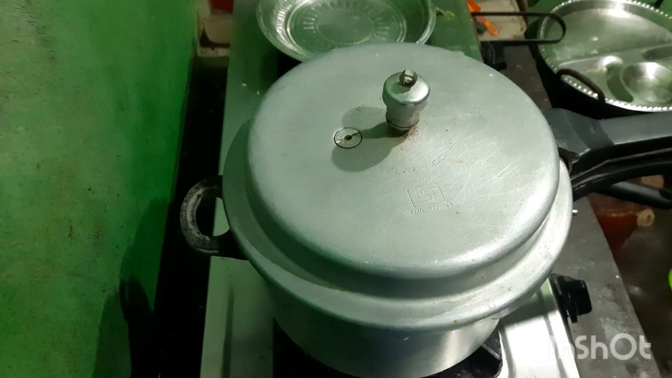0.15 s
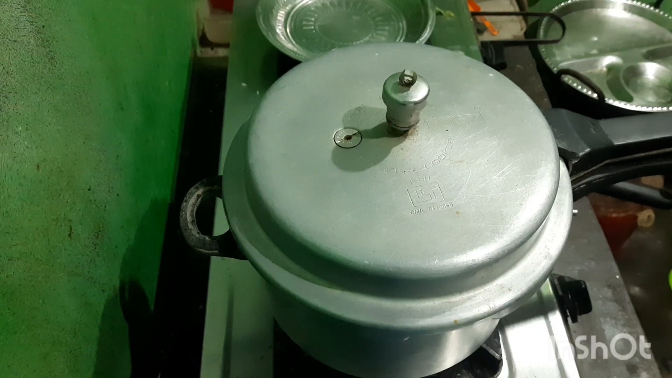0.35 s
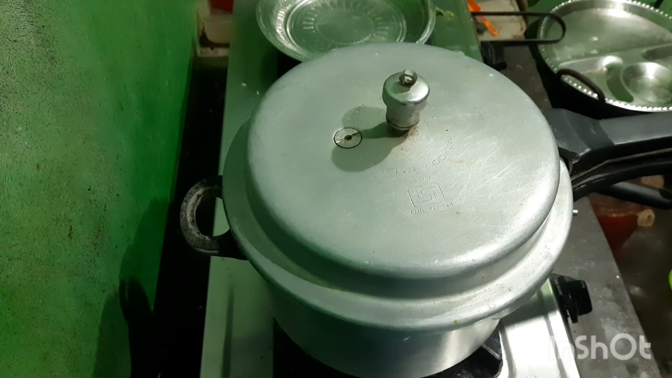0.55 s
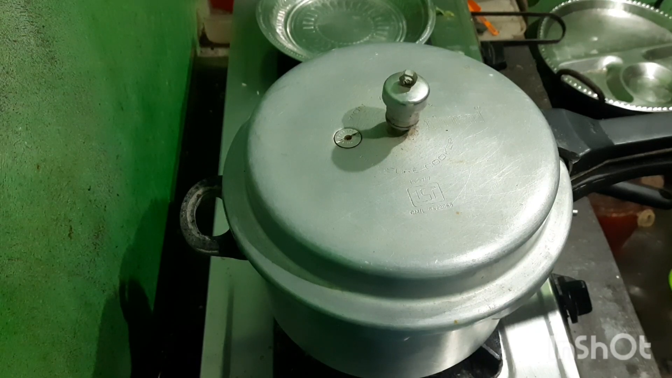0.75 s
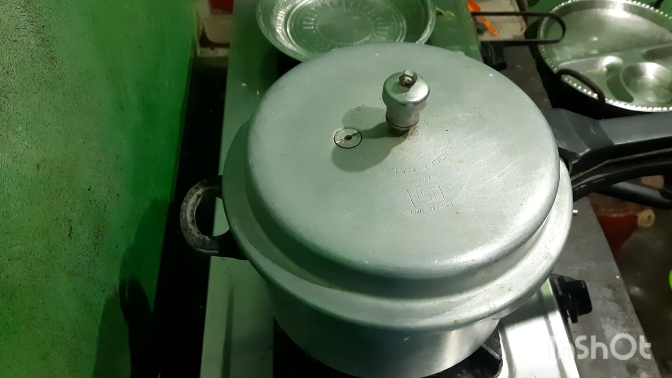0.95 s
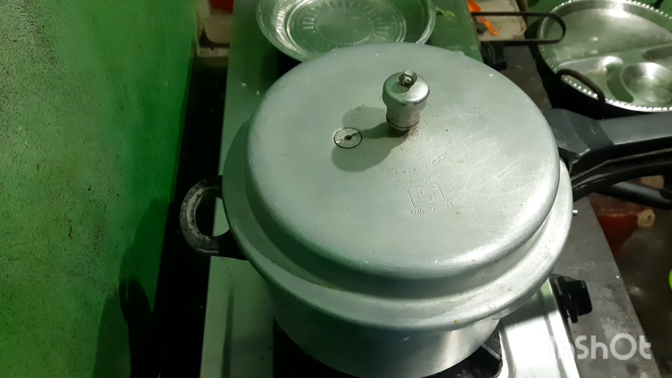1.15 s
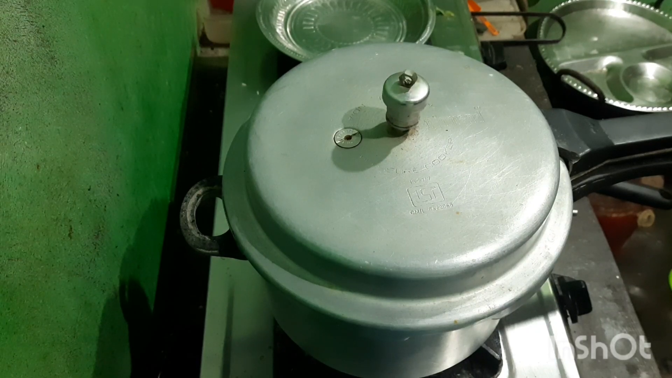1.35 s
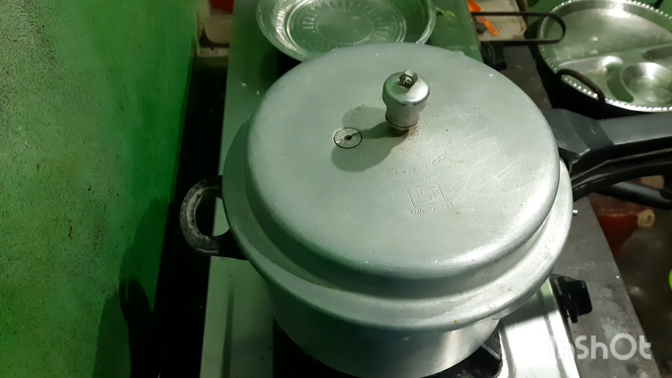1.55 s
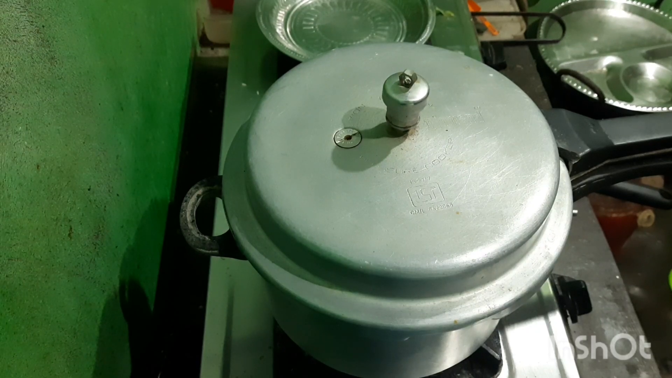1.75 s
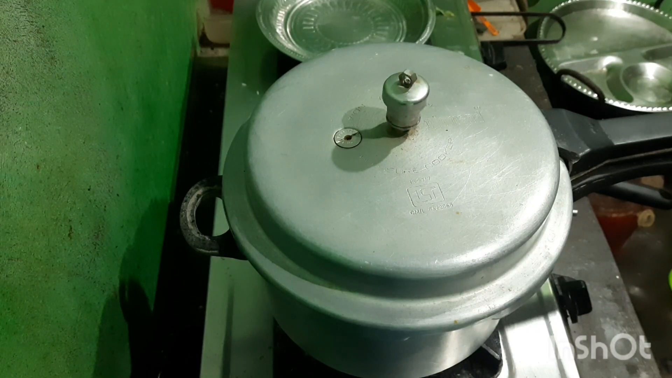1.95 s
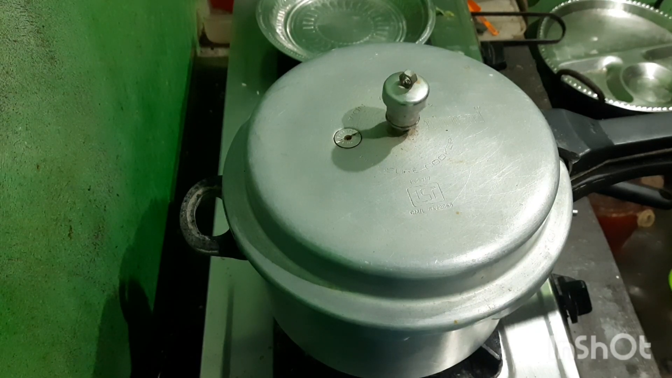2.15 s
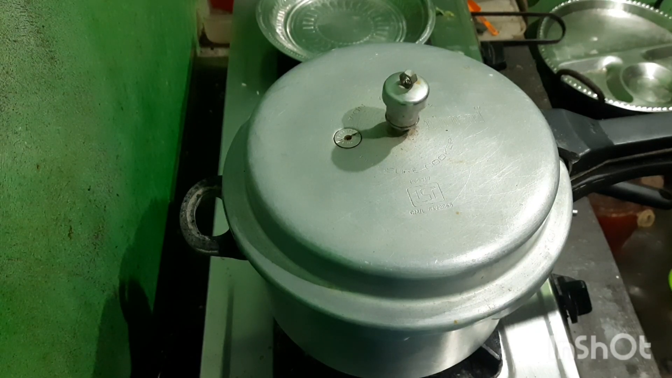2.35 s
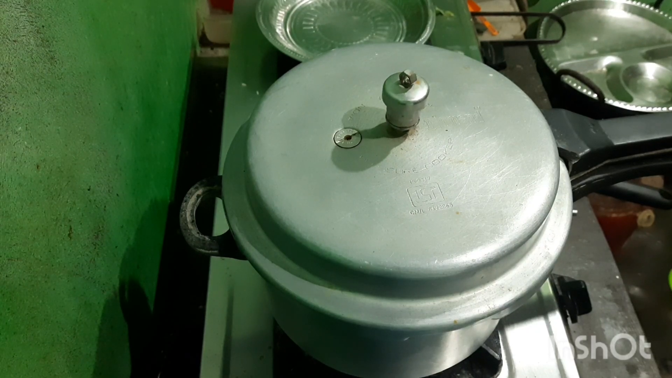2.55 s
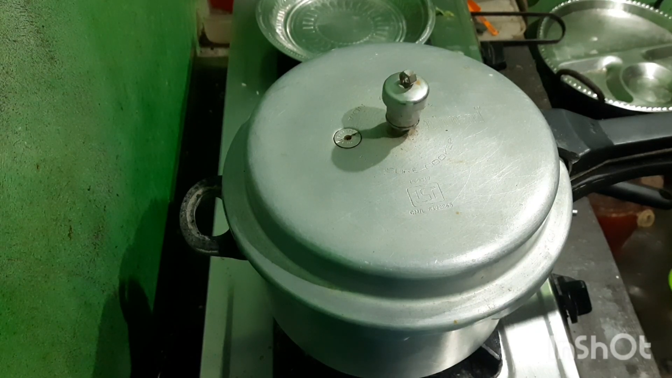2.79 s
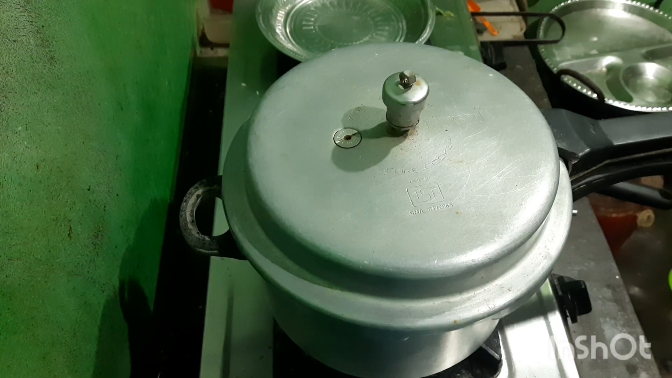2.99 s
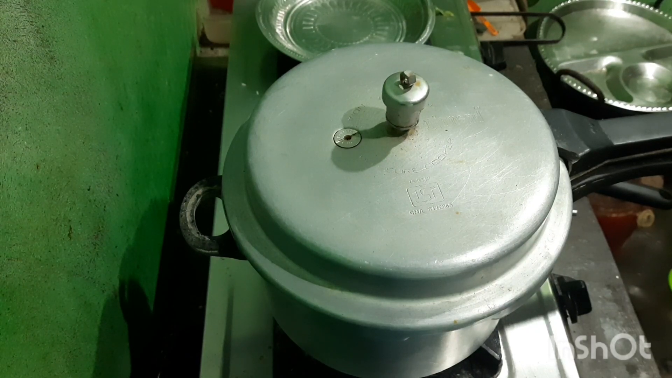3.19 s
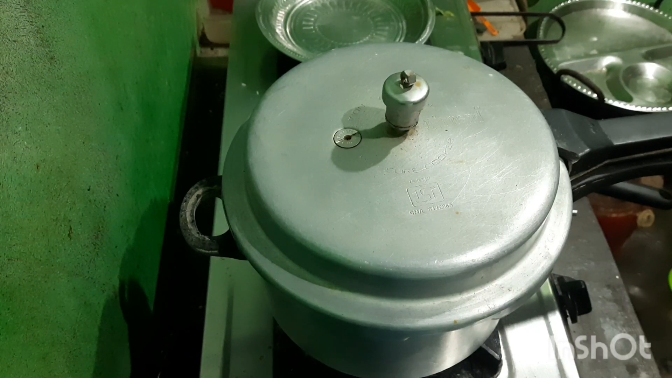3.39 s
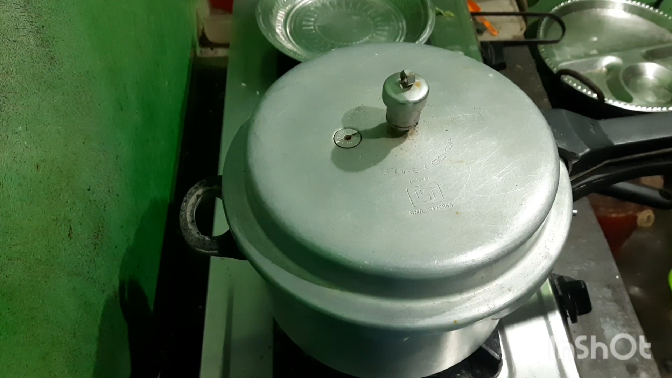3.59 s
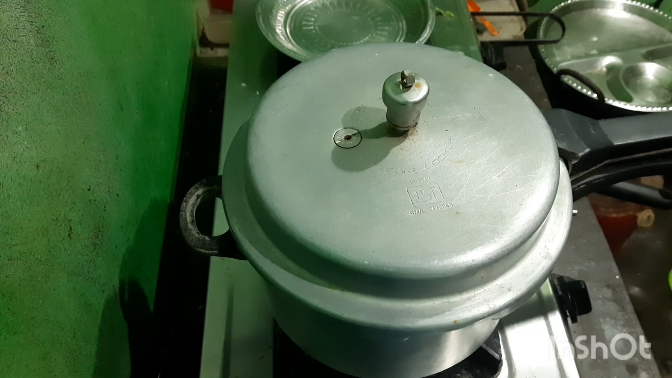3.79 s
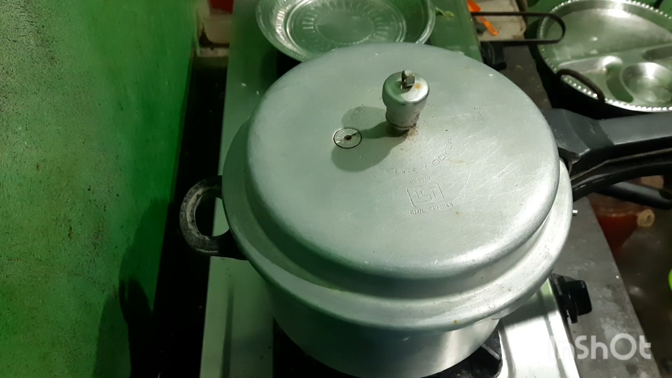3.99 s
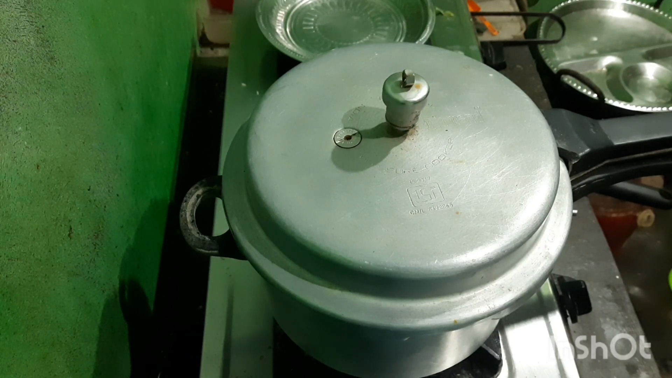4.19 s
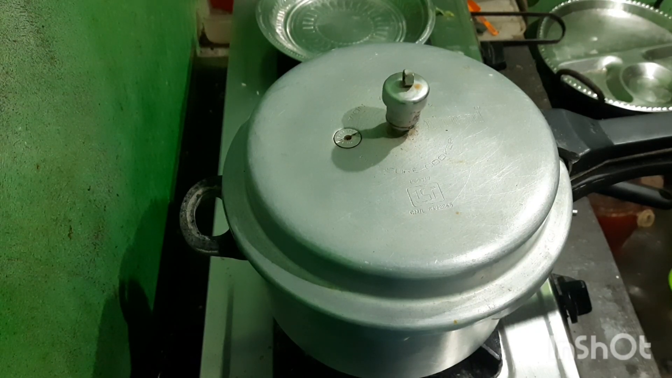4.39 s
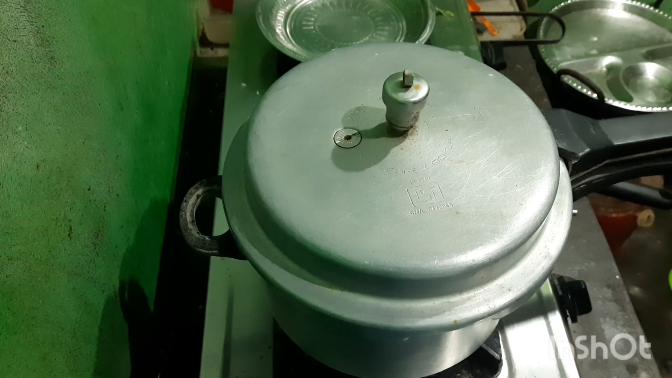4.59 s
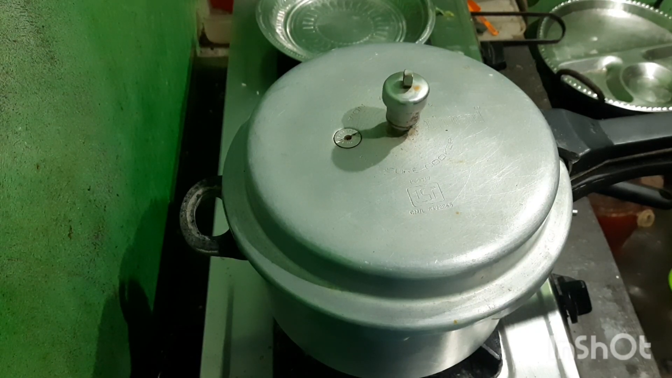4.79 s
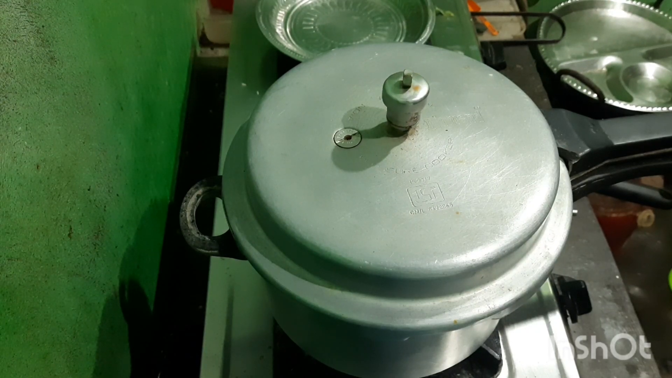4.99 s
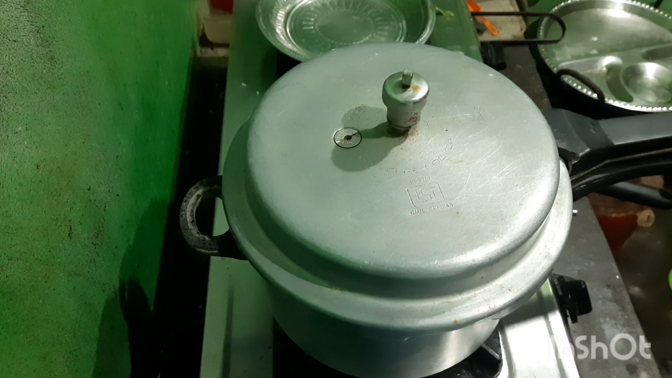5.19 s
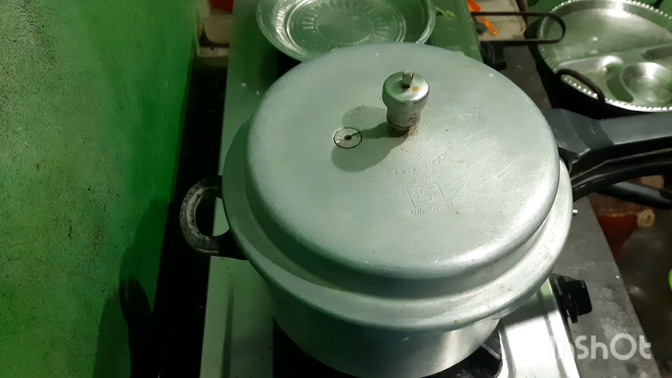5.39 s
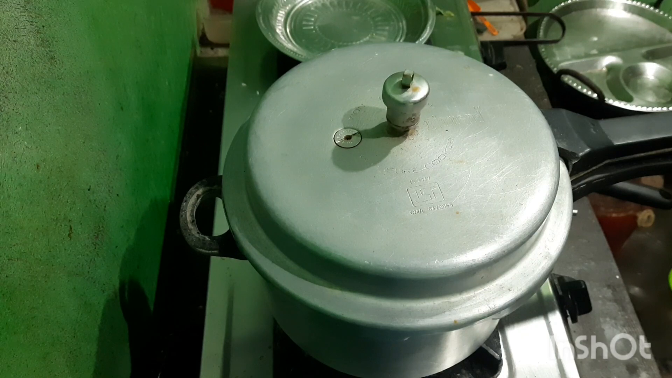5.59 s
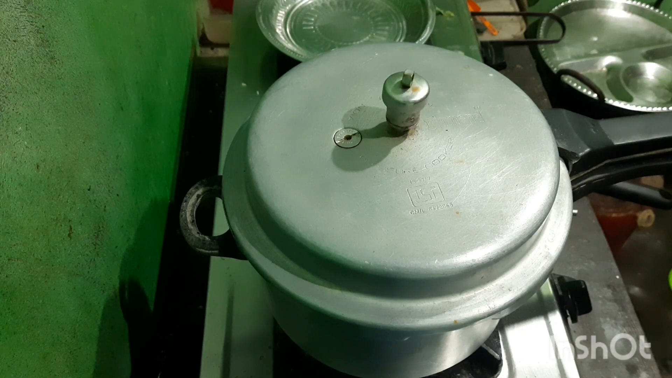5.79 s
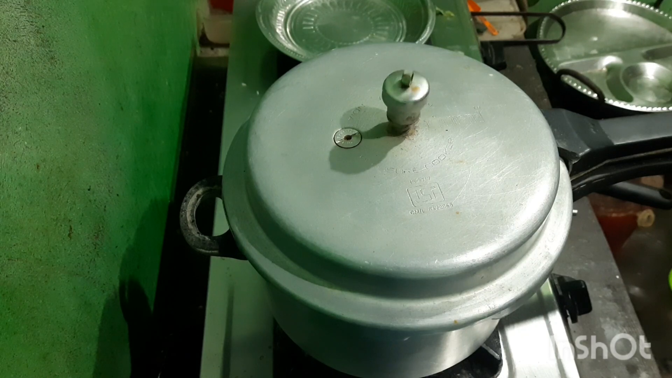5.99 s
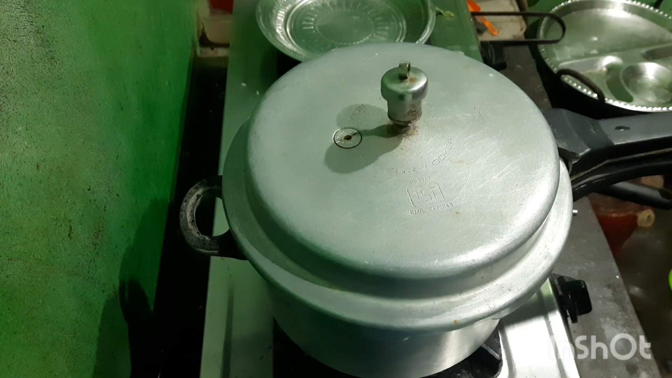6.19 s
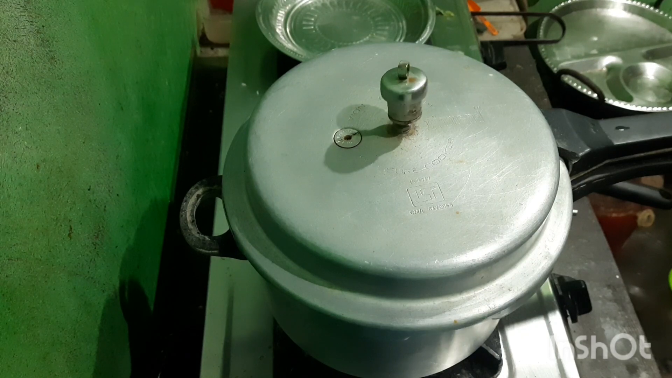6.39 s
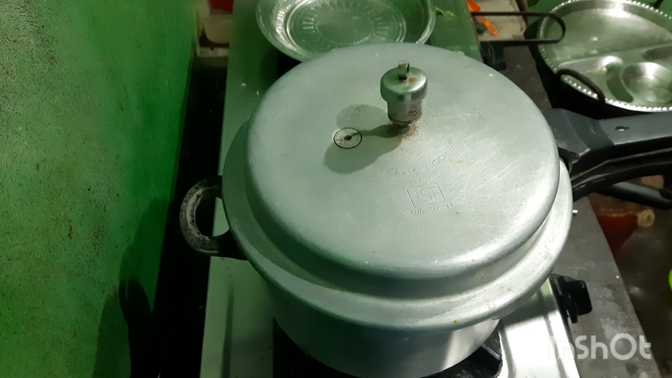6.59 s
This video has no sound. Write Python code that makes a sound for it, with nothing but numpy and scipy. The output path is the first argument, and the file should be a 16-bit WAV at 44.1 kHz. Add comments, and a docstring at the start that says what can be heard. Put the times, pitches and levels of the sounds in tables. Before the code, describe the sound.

Steam pulses from under a pressure cooker's rocking weight, building to a loud hissing blast over a low burner rumble.

```python
"""A pressure cooker hisses on a gas stove, close to a two-port microphone in a small hard kitchen.
Steam leaks under the weight, which rocks and lets it out in puffs, then lifts and vents.
The blast strikes the microphone as wind, left port first, then right.
Underneath: burner and house rumble in the room's low modes, and a fuzzy low drone."""
import sys
import numpy as np
from scipy import signal
from scipy.fft import rfft, irfft, next_fast_len
from scipy.io import wavfile
from scipy.ndimage import uniform_filter1d

SR = 44100
rng = np.random.default_rng(int(sys.argv[2]) if len(sys.argv) > 2 else 0)


def bounce(signal):
    """Save signal as a 16-bit WAV file at the path given by the first command-line argument."""
    frames = np.transpose(np.atleast_2d(signal))
    limited = np.clip(frames, -1, 1)
    pcm = np.round(limited * 32767).astype(np.int16)
    wavfile.write(sys.argv[1], SR, pcm)


N = 293265

# low drone: time_s, pitch_hz, level_db
DRONE = [(0, 189.8, -49), (1.2, 196.6, -51), (1.4, 180.4, -52.5), (3, 183.8, -49.5), (3.5, 181.4, -47),
         (5.3, 188.5, -48.5), (5.45, 185, -57), (6.65, 186, -63)]

# kitchen rumble: time_s, level_db, deep_gain_db
RUMBLE = [(0, -44, -4), (.08, -40.5, 2.5), (.6, -42.5, 0.5), (1.1, -42, 2.5), (1.7, -42.5, 0),
          (2.2, -44, 4), (2.7, -42.5, 0.5), (3.3, -43.5, -2.5), (4.3, -43.5, 2), (5, -46, -2),
          (5.5, -46, -1), (6, -44.5, -2.5)]
# rumble spectrum: freq_hz, gain_db
RUMBLE_SPECTRUM = [(30, -32), (55, -24), (75, -15), (140, -21), (270, -18), (420, -19), (550, -19),
                   (620, -27), (1000, -32), (2000, -50)]
# low room modes: centre_hz, width_hz, gain_db
ROOM_MODES = [(84, 16, 13), (107, 12, 16), (205, 22, 9), (247, 9, 10), (301, 11, 9), (344, 11, 11),
              (400, 20, 5)]
# rumble likeness between ports: freq_hz, coherence
RUMBLE_COHERENCE = [(60, 1), (200, 0.99), (400, 0.87), (700, 0.66)]

# wind per port, before the high-pass: time_s, level_db, fine_eddy_gain_db
WIND_LEFT = [(5.975, -47, -8.0), (5.985, -32, -15), (6.04, -27.5, 0), (6.094, -29, -1), (6.149, -31, 1),
             (6.203, -23, -1.7), (6.258, -24.5, -2), (6.312, -31, 6), (6.367, -30, 6.5),
             (6.422, -26.5, -2.5), (6.476, -31.5, 3.5), (6.531, -28.5, 3.5), (6.585, -36, 2),
             (6.64, -34, 8)]
WIND_RIGHT = [(6.04, -37, -8.0), (6.05, -24, -17), (6.099, -21.5, -10), (6.148, -16, -5),
              (6.197, -13.5, -5.5), (6.247, -17, -1), (6.296, -23.5, -4), (6.345, -19.0, -27),
              (6.394, -25, -12), (6.443, -30, -8), (6.492, -35, -3), (6.542, -18.5, -14),
              (6.591, -18, -4.5), (6.64, -17.5, -8.5)]
# blast front and hardest slaps: start_s, port (0 = left), signed_peak, width_ms
SLAPS = [(5.982, 0, -0.3, .9), (6.043, 1, 0.37, 1), (6.116, 1, 0.79, 0.89), (6.315, 0, -.27, 0.35),
         (6.35, 1, 0.58, 0.95), (6.373, 1, 0.64, 0.34), (6.515, 1, 0.72, .9), (6.544, 0, -.24, 0.55)]

# steam flow under the puffs: time_s, flow_db, valve_opening (0-1)
LEAK = [(0, -39.5, 0.3), (.06, -40, 0.7), (.24, -41, 0.7), (.246, -28, 0.3), (.6, -27, 0.28),
        (1.2, -28.5, 0.2), (1.45, -28.5, 0.22), (1.9, -28, 0.26), (2.3, -27.5, .4), (2.75, -28, 0.4),
        (2.95, -26.5, 0.54), (3.1, -29.5, 0.6), (3.4, -26.5, 0.72), (4, -28, 0.55), (4.5, -28, .6),
        (4.8, -25, 0.43), (5.1, -31.5, 0.67), (5.45, -22, 0.9), (5.53, -30, 0.85), (5.7, -21, 0.88),
        (5.79, -25.5, 0.64), (5.87, -19, 0.87), (5.95, -18, 0.5), (6.01, -19, 0.33), (6.13, -17, 0.42),
        (6.38, -19, 0.46), (6.53, -18, 0.5), (6.65, -17.5, 0.3)]
# one puff per rock of the weight: centre_s, peak_flow_db, length_s
PUFFS = [(0.264, -34, 0.06), (0.385, -33, 0.13), (0.544, -29.5, 0.3), (0.677, -45, 0.051),
         (0.76, -27.5, 0.095), (0.906, -27.5, 0.29), (1.05, -27.5, 0.17), (1.164, -28.5, 0.12),
         (1.275, -24.5, 0.13), (1.355, -26, 0.13), (1.477, -23, 0.13), (1.558, -23, 0.093),
         (1.673, -24.5, 0.095), (1.774, -25, 0.083), (1.885, -25, 0.096), (1.99, -26, 0.096),
         (2.068, -27, 0.11), (2.166, -27.3, 0.094), (2.249, -27.5, 0.12), (2.387, -26.5, 0.11),
         (2.506, -24, 0.1), (2.61, -24.5, 0.11), (2.713, -24.5, 0.085), (2.819, -23, 0.098),
         (3.054, -27, 0.14), (3.179, -26, 0.11), (3.294, -26.5, 0.094), (3.386, -29, 0.04),
         (3.469, -28, 0.12), (3.571, -27, 0.1), (3.68, -25.5, 0.087), (3.812, -26, 0.1), (3.932, -24, 0.14),
         (4.058, -23.5, 0.13), (4.193, -22.7, 0.16), (4.346, -25, 0.12), (4.458, -22.5, 0.135),
         (4.61, -24, 0.15), (4.735, -29.5, 0.089), (4.882, -24, 0.21), (5.011, -19.5, 0.13),
         (5.148, -21, 0.195), (5.414, -23, 0.15), (5.588, -24, 0.055), (5.643, -21, 0.1),
         (5.697, -21, 0.049)]
# band response to flow: freq_hz, slope_db_per_db
FLOW_SLOPE = [(700, 0.89), (3000, 0.9), (9000, 1.15), (15000, 1.18)]
# jet spectrum, valve nearly shut and open: freq_hz, shut_left_db, shut_right_db, open_left_db, open_right_db
JET_SPECTRUM = [(352, -37, -38, -34, -36), (775, -10, -10.5, -14.5, -18.5),
                (1360, -14, -12.5, -15.5, -13.5), (2270, -10.5, -12.5, -11.5, -13),
                (5400, -6.5, -7, -8.5, -9), (6050, -3.5, -7, -7.5, -6), (8050, -6, -5.5, 0, -3.5),
                (11500, -4, -7, 2.5, 4), (14100, -1, -6, 3, -2), (15500, -8.5, -11, -2.5, -5)]
# cavities of the weight, shadows at the ports: centre_hz, width_hz, left_db, right_db
CAVITIES = [(3100, 600, 2, 3.5), (3450, 500, 3, 0), (4100, 400, -2, -1), (4800, 400, -2.5, 0),
            (5750, 800, 4, 2), (6650, 500, 1.5, 2), (9200, 600, 1, 3.5), (9950, 800, 4.5, 1),
            (10150, 350, 0, 3), (10900, 600, -3, 0), (11750, 400, 0, -2.5), (13500, 500, 1.5, .5)]
# slow drift of the jet colour: time_s, body_db, left_ring_db, top_db, right_treble_db
COLOUR_DRIFT = [(0, -5.5, 4, -1, 3.5), (.24, 3, 4, 1, 2), (.26, -0.5, 7, -2, -3), (1.3, -1.5, 8.5, 2, -0.5),
                (2, 0.5, 5.5, 4, -2), (2.6, 1, 4, 0, -0.5), (2.8, 3, 2, 1, -0.5), (3.3, 1.5, 1, 2, -1.5),
                (4.2, -1.5, 1, 4, 0), (4.8, -1, 3, 0, -0.5), (5.3, 1.5, 4.5, 4, -2.5),
                (5.9, 0.5, 4, 5, -2.5), (6.1, -1.5, 1, 4, 0), (6.65, -0.5, 6, 4, -1)]
# jet likeness between ports: freq_hz, coherence, right_lead_rad
JET_COHERENCE = [(500, .6, 0), (1200, .25, .4), (2800, .88, 0), (3700, .35, -.2), (4350, .68, .1),
                 (5000, .2, -.3), (6600, .5, -.2), (7700, .15, .2), (8600, .55, 1.2), (10200, .65, -.2),
                 (11500, .5, -1.1), (13200, .45, -1.6), (14200, .4, .7), (15500, .35, -1.1)]
# spectral ripple from reflections: freq_hz, spread_db
RIPPLE = [(500, 2.6), (7000, 2.2), (12000, 1.3)]


def amp(db):
    return 10 ** (np.asarray(db) / 20)


def unit_rms(x):
    return x / np.sqrt(np.mean(x ** 2) + 1e-20)


def bell(hz, centre_hz, width_hz):
    return 1 / (1 + (2 * (hz[:, None] - centre_hz) / width_hz) ** 2)


def over_hz(table, hz):
    """Table columns interpolated over log frequency."""
    freq_hz, *columns = np.transpose(table)
    return [np.interp(np.log(hz + 1), np.log(freq_hz), c)[:, None] for c in columns]


def over_time(table, t):
    """Table columns interpolated over time."""
    time_s, *columns = np.transpose(table)
    return [np.interp(t, time_s, c) for c in columns]


def patches(t, hz, span_frames, span_bins):
    """Smooth random field, bins x frames, unit RMS."""
    field = rng.standard_normal((len(t), len(hz)))
    field = uniform_filter1d(field, size=span_frames, axis=0)
    return unit_rms(uniform_filter1d(field, size=span_bins, axis=1)).T


def noise_pair(left_db, right_db, coherence, lead_rad, fft_size):
    """Two partly coherent noises from short-time levels, bins x frames."""
    a, b, c, d = rng.standard_normal(left_db.shape[::-1] + (4,)).T
    coherence = np.clip(coherence, 0, 1)
    left = a + 1j * b
    right = coherence * np.exp(1j * lead_rad) * left + np.sqrt(1 - coherence ** 2) * (c + 1j * d)
    spectra = np.array([left * amp(left_db), right * amp(right_db)])
    _, pair = signal.istft(spectra, nperseg=fft_size, noverlap=fft_size * 3 // 4)
    return pair[:, :N] / np.sqrt(fft_size)


def drone(width_hz=15):
    """Narrow noise band on a low pitch; fades before the vent."""
    pitch_hz, level_db = over_time(DRONE, np.arange(N) / SR)
    slow = signal.lfilter(*signal.butter(2, width_hz / 2, fs=SR), rng.standard_normal((2, N)))
    phase_rad = 2 * np.pi * np.cumsum(pitch_hz) / SR
    return unit_rms(slow[0] * np.cos(phase_rad) + slow[1] * np.sin(phase_rad)) * amp(level_db)


def kitchen_rumble(swell_db=1.0, left_bias_db=1.6, deep_hz=130):
    """Burner and house rumble, gathered in low room modes that swell unevenly."""
    t, hz = np.arange(N // 1024 + 5) * 1024 / SR, np.fft.rfftfreq(4096, 1 / SR)
    band_db = over_hz(RUMBLE_SPECTRUM, hz)[0]
    for centre_hz, width_hz, gain_db in ROOM_MODES:
        band_db = band_db + gain_db * bell(hz, centre_hz, width_hz)
    band_db = band_db + swell_db * patches(t, hz, span_frames=5, span_bins=8)
    deep_gain_db = over_time(RUMBLE, t)[1]
    band_db += deep_gain_db * (hz[:, None] < deep_hz)
    coherence = over_hz(RUMBLE_COHERENCE, hz)[0]
    rumble = noise_pair(band_db + left_bias_db, band_db, coherence, lead_rad=0, fft_size=4096)
    level_db = over_time(RUMBLE, np.arange(N) / SR)[0]
    return unit_rms(rumble) * amp(level_db)


def eddies(rate_per_s, rise_ms, spread_db, push_share=.5):
    """Random pressure bumps of uneven size; a share pushes, the rest pulls."""
    size_draw, sign_draw, time_draw = rng.random((3, N))
    sizes = amp(spread_db * np.minimum(-np.log(size_draw), 2.5))
    kicks = sizes * np.sign(push_share - sign_draw) * (time_draw < rate_per_s / SR)
    age = np.arange(1500) / SR / (rise_ms / 1000)
    return unit_rms(signal.oaconvolve(kicks, age * np.exp(-age))[:N])


def blast_wind(low_cut_hz=60):
    """Eddies and slaps strike each port separately; the microphone drops their lowest part."""
    t, pressure = np.arange(N) / SR, np.zeros((2, N))
    for port, table in enumerate((WIND_LEFT, WIND_RIGHT)):
        level_db, fine_db = over_time(table, t)
        large = amp(-2.5) * eddies(rate_per_s=150, rise_ms=1.77, spread_db=2.9)
        middle = eddies(rate_per_s=500, rise_ms=0.44, spread_db=4.2)
        fine = amp(fine_db) * eddies(rate_per_s=1500, rise_ms=0.054, spread_db=7.8, push_share=.75)
        onset_s = table[0][0]
        pressure[port] = (large + middle + fine) * amp(level_db) * (t > onset_s)
    for start_s, port, peak, width_ms in SLAPS:
        age = np.maximum(t - start_s, 0) / (width_ms / 2000)
        pressure[round(port)] += peak * age * np.exp(1 - age)
    return signal.lfilter(*signal.butter(2, low_cut_hz, "high", fs=SR), pressure)


def wall_reflections(hiss, ripple_hz=25):
    """Walls and pans reflect the hiss: a fine static spectral ripple, different per port."""
    fft_size = next_fast_len(N)
    ripple = rng.standard_normal((2, fft_size // 2 + 1))
    ripple = unit_rms(uniform_filter1d(ripple, size=int(ripple_hz * fft_size / SR), axis=1))
    spread_db = over_hz(RIPPLE, np.fft.rfftfreq(fft_size, 1 / SR))[0].T
    return irfft(rfft(hiss, fft_size) * amp(spread_db * ripple), fft_size)[:, :N]


def rocking_weight_flow_db(t, leak_db):
    """Each rock of the weight adds a smooth puff to the leak; powers sum."""
    centre_s, peak_db, length_s = np.transpose(PUFFS)[:, :, None]
    puffs = np.cos(np.pi * np.clip((t - centre_s) / length_s, -.5, .5)) ** 2
    return 10 * np.log10(amp(2 * leak_db) + (amp(2 * peak_db) * puffs).sum(0))


def jet_colour_db(t, hz, opening, body_hz=4000, treble_hz=9000):
    """Left and right jet spectra: brighter as the valve opens, shaped by cavities, slowly drifting."""
    shut_left, shut_right, open_left, open_right = over_hz(JET_SPECTRUM, hz)
    left_db = shut_left + opening * (open_left - shut_left)
    right_db = shut_right + opening * (open_right - shut_right)
    for centre_hz, width_hz, left_gain_db, right_gain_db in CAVITIES:
        peak = bell(hz, centre_hz, width_hz)
        left_db += left_gain_db * peak
        right_db += right_gain_db * peak
    body_db, ring_db, top_db, treble_db = over_time(COLOUR_DRIFT, t)
    left_db += ring_db * bell(hz, centre_hz=12500, width_hz=900)
    right_db += treble_db * (1 - bell(hz, 0, 2 * treble_hz))
    common_db = body_db * bell(hz, 0, 2 * body_hz) + top_db * bell(hz, centre_hz=15300, width_hz=900)
    return left_db + common_db, right_db + common_db


def steam_jet(flow_flutter_db=0.48, patch_db=.8, sway_db=1.4, pivot_db=-27, gain_db=8.0):
    """Turbulent jet noise; throbs with the weight, flutters as a whole and in spectral patches."""
    t, hz = np.arange(N // 64 + 5) * 64 / SR, np.fft.rfftfreq(256, 1 / SR)
    leak_db, opening = over_time(LEAK, t)
    flutter = unit_rms(uniform_filter1d(rng.standard_normal(len(t)), size=6))
    flow_db = rocking_weight_flow_db(t, leak_db) + flow_flutter_db * flutter
    band_db = pivot_db + over_hz(FLOW_SLOPE, hz)[0] * (flow_db - pivot_db)
    band_db += patch_db * patches(t, hz, span_frames=40, span_bins=6)
    # narrow colourations come and go as the hand-held microphone sways
    band_db += sway_db * patches(t, hz, span_frames=300, span_bins=2)
    left_db, right_db = jet_colour_db(t, hz, opening)
    coherence, lead_rad = over_hz(JET_COHERENCE, hz)
    hiss = noise_pair(band_db + left_db, band_db + right_db, coherence, lead_rad, fft_size=256)
    return hiss * amp(gain_db)


def scene():
    return wall_reflections(steam_jet()) + kitchen_rumble() + drone() + blast_wind()


def record(dry):
    """The microphone rounds off the hardest gusts, drops the deep bass and limits the band."""
    ceiling, low_cut_hz, high_cut_hz = .85, 45, 15740
    rounded = ceiling * np.tanh(dry / ceiling)
    thinned = signal.lfilter(*signal.butter(2, low_cut_hz, "high", fs=SR), rounded)
    low_pass = signal.firwin(1023, high_cut_hz, window=("kaiser", 10), fs=SR)
    return signal.oaconvolve(thinned, low_pass[None], "same")


dry = scene()
out = record(dry)
bounce(out)
```